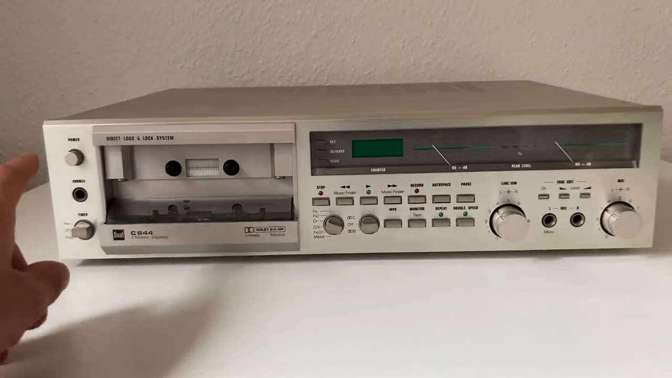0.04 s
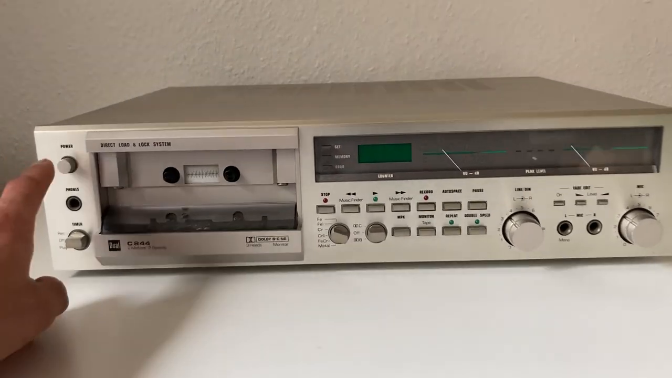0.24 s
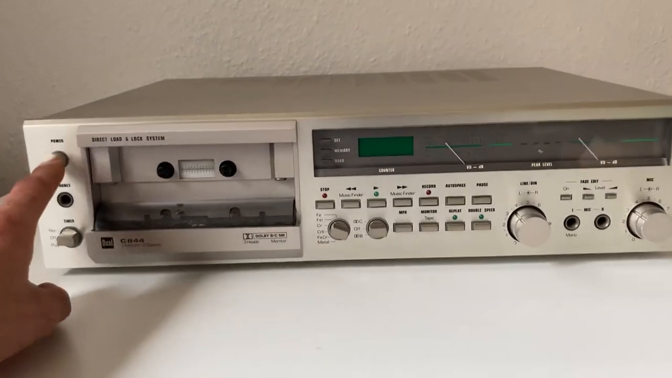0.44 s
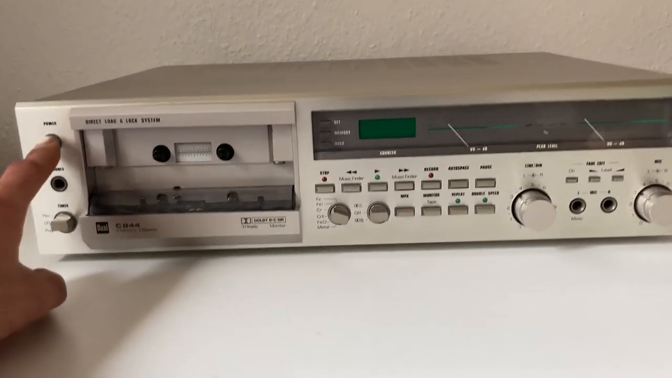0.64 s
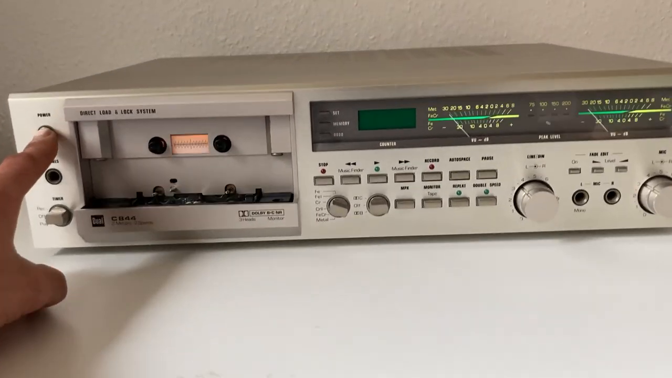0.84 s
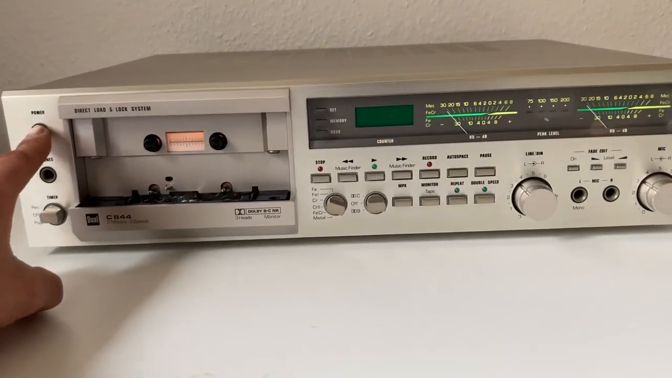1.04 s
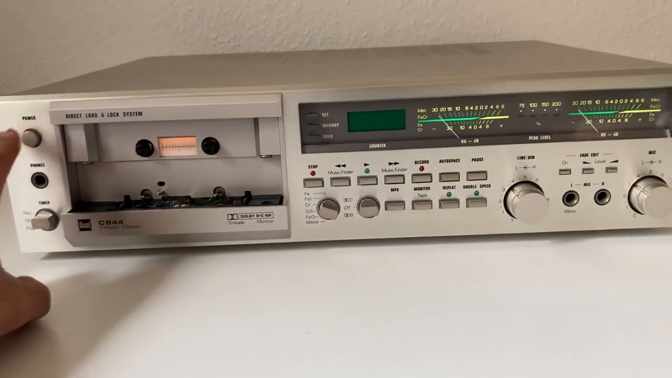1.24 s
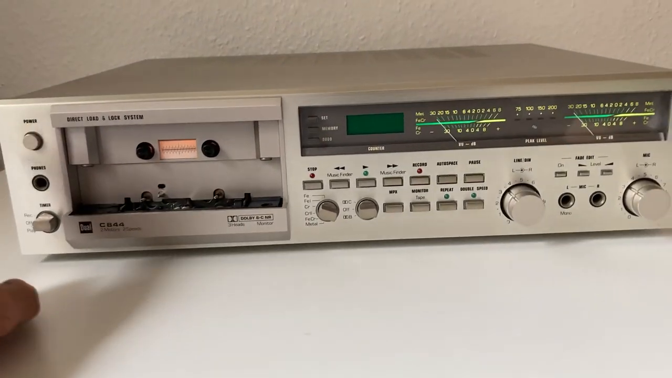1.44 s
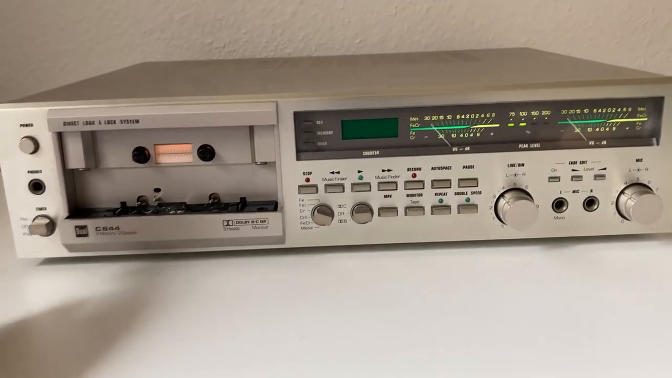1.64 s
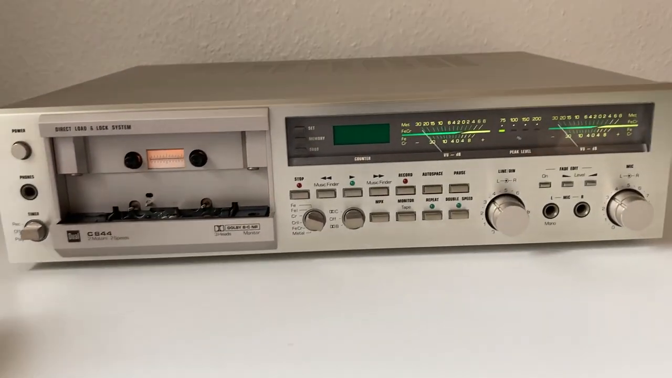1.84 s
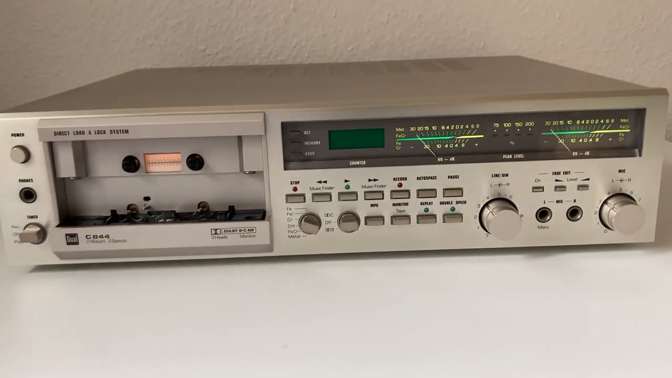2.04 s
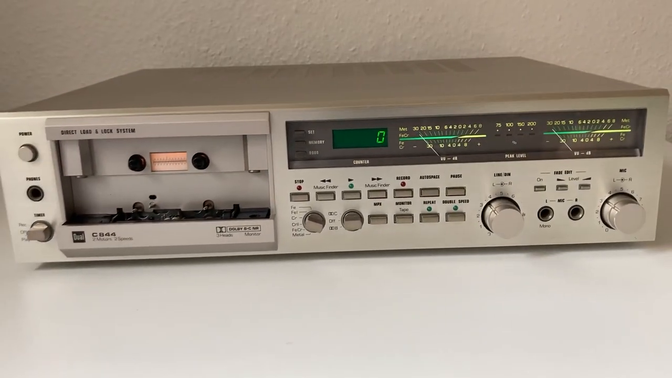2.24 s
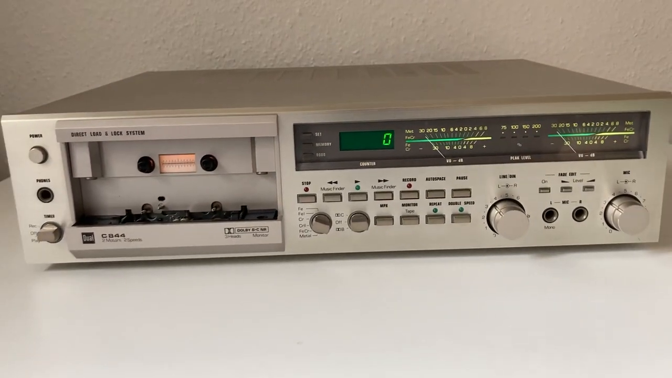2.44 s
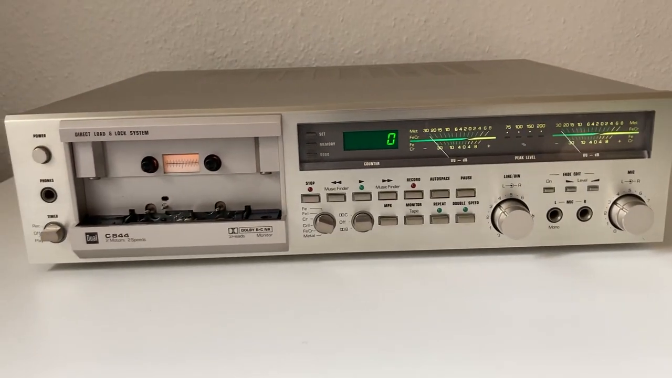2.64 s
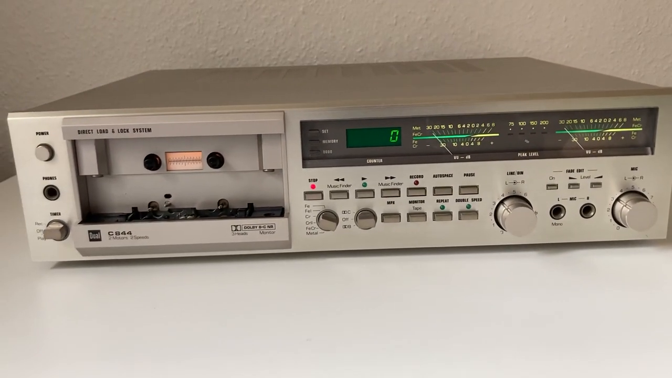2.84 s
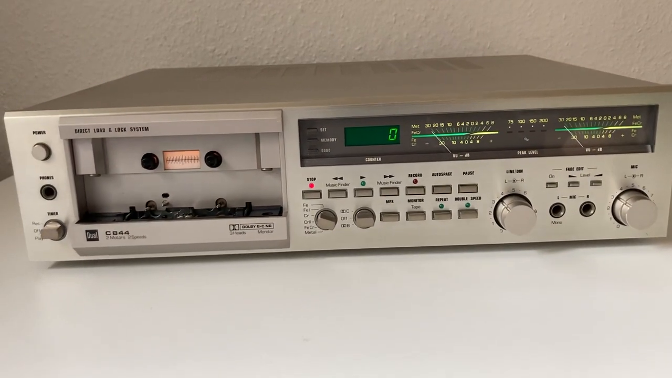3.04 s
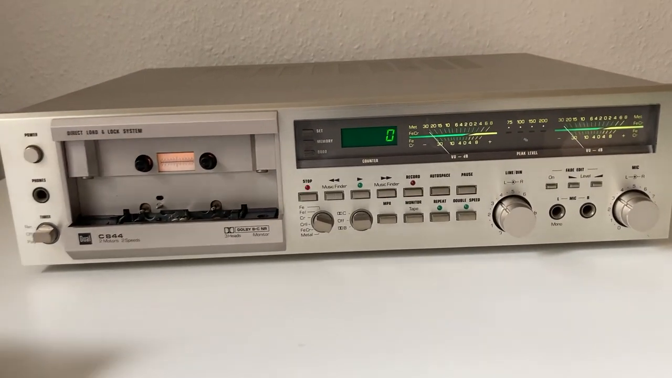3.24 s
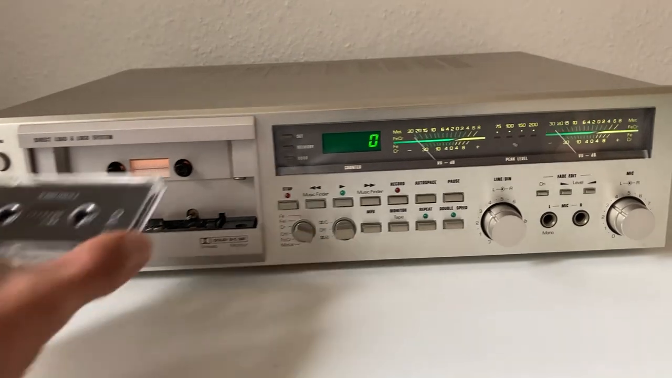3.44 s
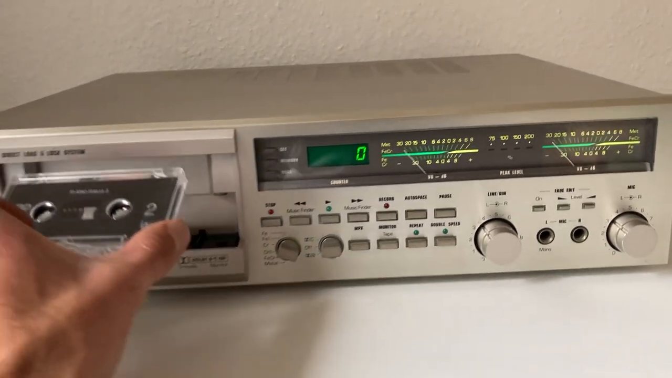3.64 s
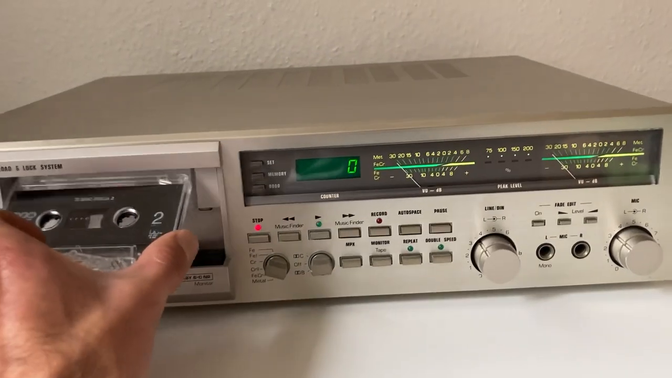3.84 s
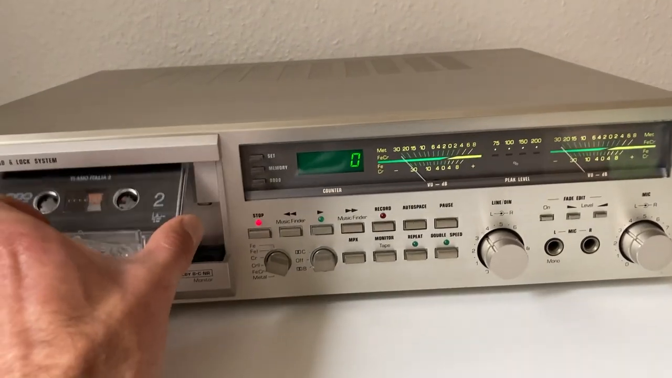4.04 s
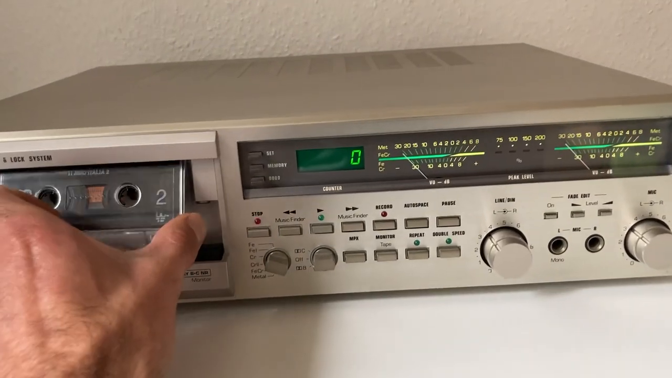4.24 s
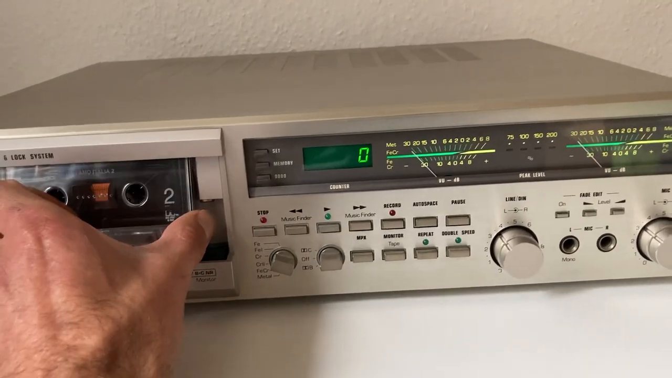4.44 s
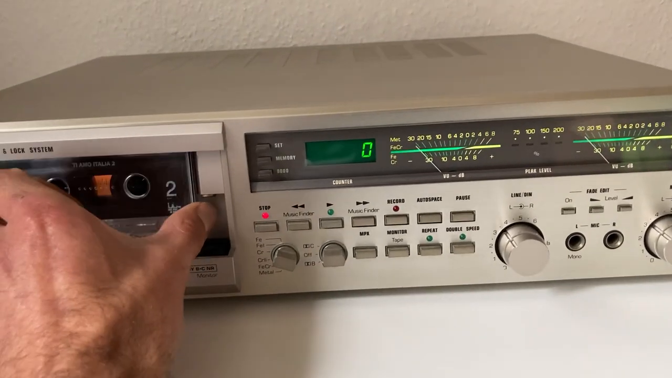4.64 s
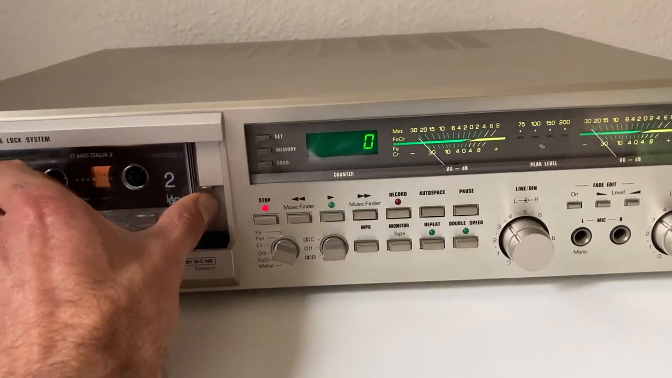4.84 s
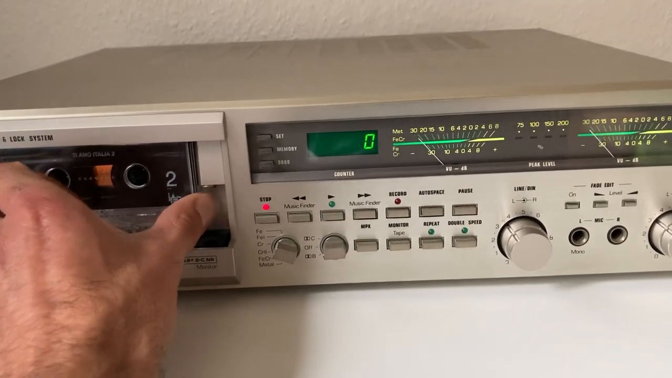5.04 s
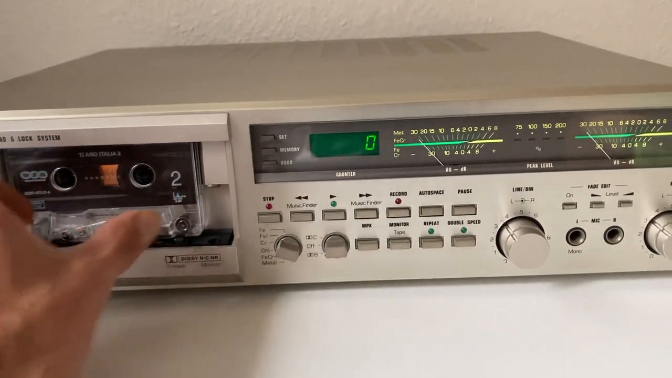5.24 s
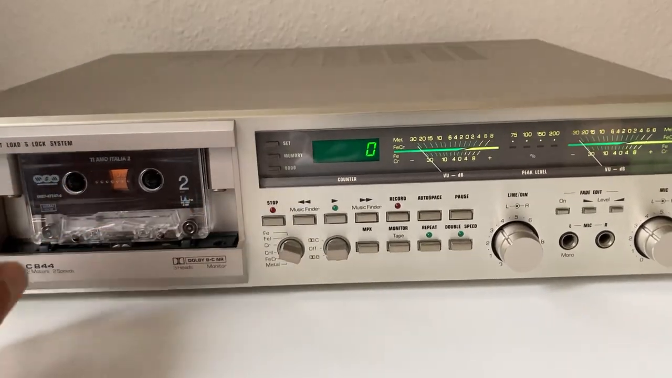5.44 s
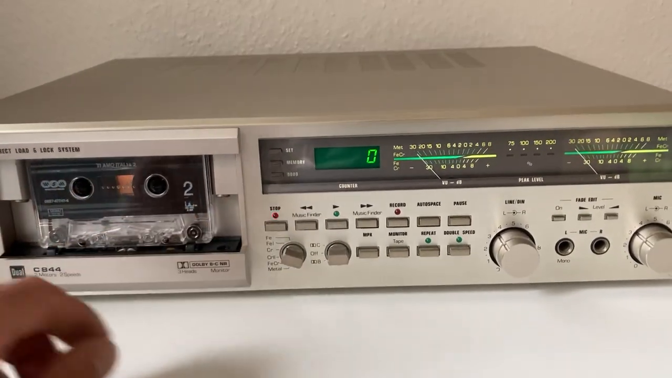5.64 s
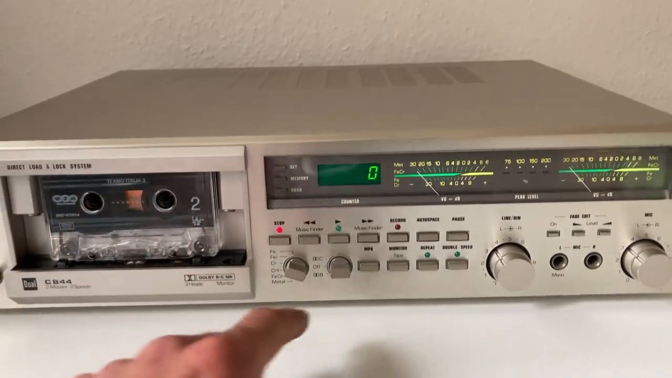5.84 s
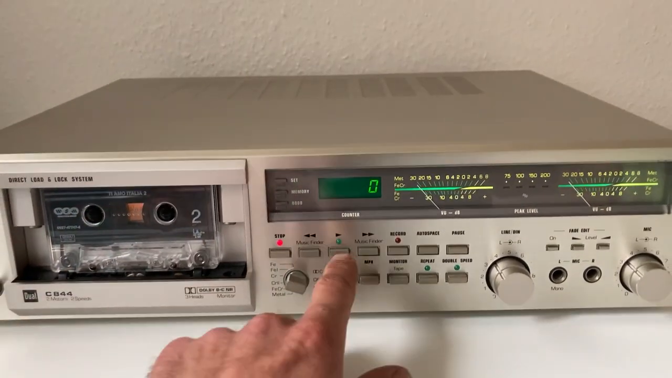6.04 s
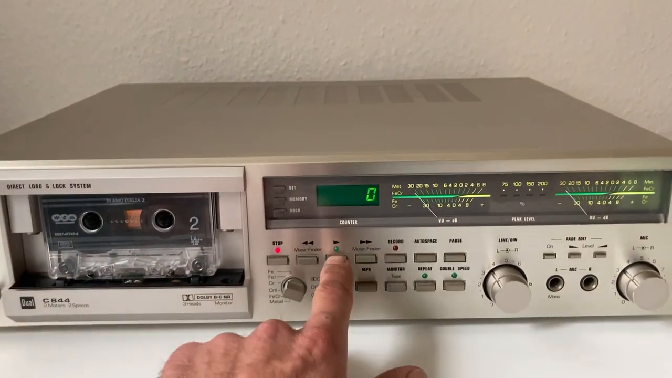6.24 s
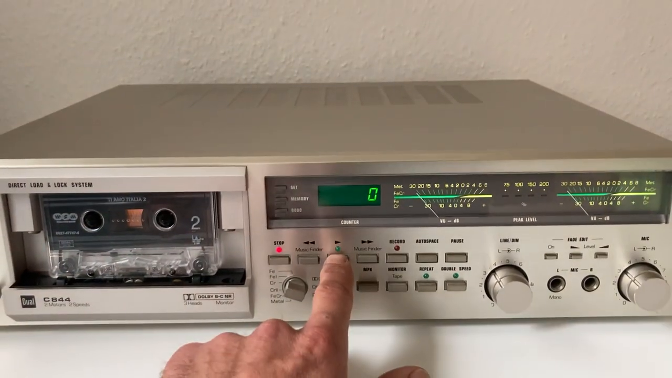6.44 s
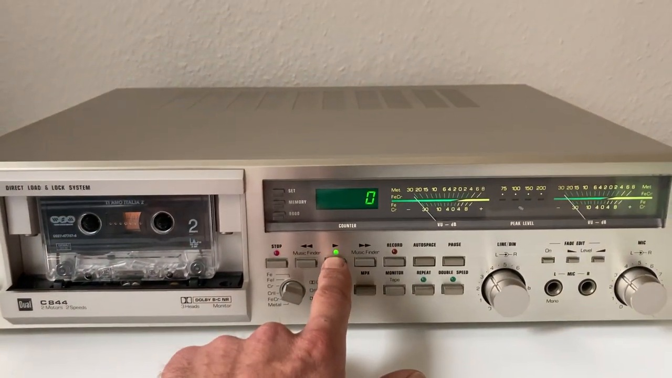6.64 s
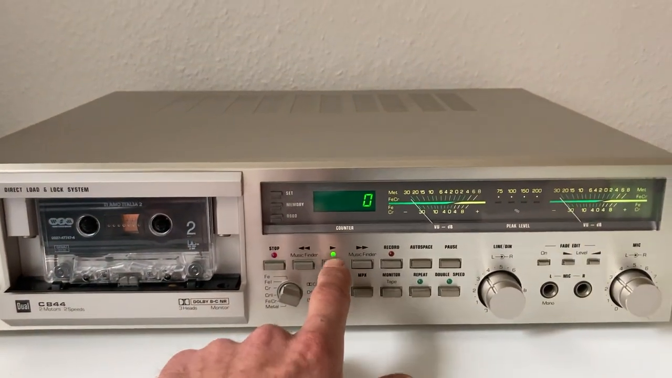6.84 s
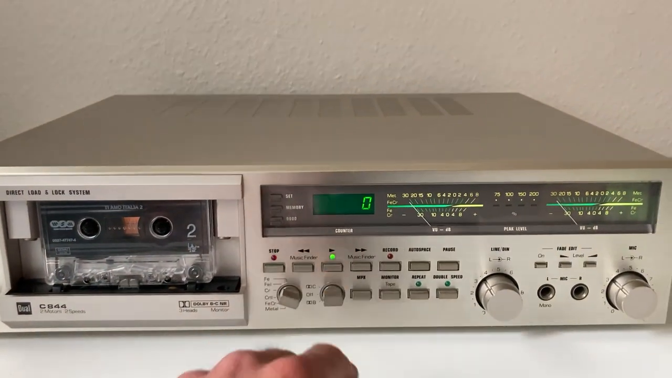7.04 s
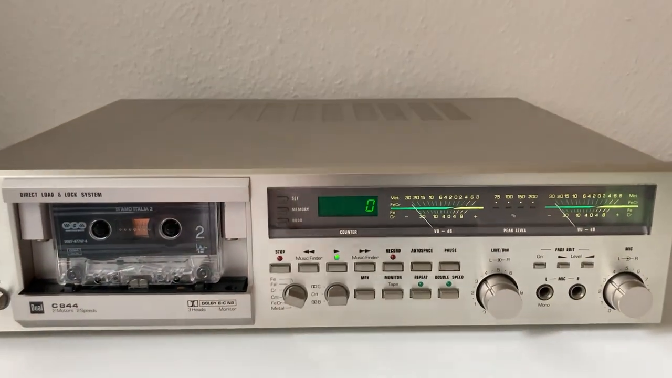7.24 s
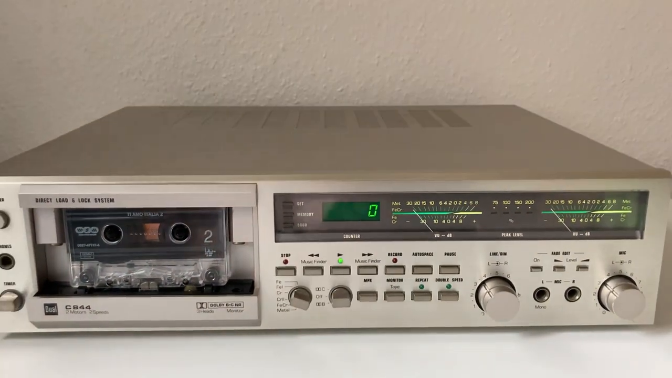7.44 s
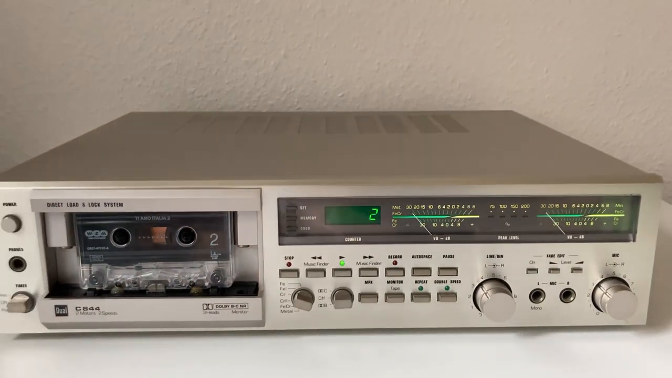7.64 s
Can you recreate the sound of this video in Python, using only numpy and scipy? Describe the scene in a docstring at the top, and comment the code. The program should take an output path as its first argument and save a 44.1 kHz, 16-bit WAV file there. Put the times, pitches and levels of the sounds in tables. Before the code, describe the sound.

Close up in a small quiet room, a finger slides onto a deck's power button, which clicks in and springs back with a faint rattle. Internal latches snap sharply. A plastic cassette knocks and scrapes into its well, juddering and ticking until it seats. A key clicks faintly, a heavy clack starts a small motor that whirrs and whines under load, and two more clacks follow close together.

```python
"""A cassette deck on a table in a small quiet room, heard from close by. Skin and plastic slide; the power switch
is pushed in, let go and rattles; the drive's latches click; a hand seats a cassette, which judders and ticks.
A play key clicks, then a motor whirrs, whines under load and winds the head carriage up in three heavy clacks.
Each blow is a short noise burst, coloured by the struck part, that excites decaying modes and the room's echo;
sliding and motor are modulated noise, the whine is a drifting tone, and still air sounds throughout."""
import sys
import numpy as np
from scipy import signal
from scipy.fft import rfft, irfft
from scipy.io import wavfile
from scipy.ndimage import uniform_filter1d

SR = 44100
rng = np.random.default_rng(int(sys.argv[2]) if len(sys.argv) > 2 else 0)


def master(y):
    """Save y as 16-bit WAV."""
    cut = np.clip(np.atleast_2d(y).T, -1, 1)
    pcm = np.round(cut * 32767)  # scale
    wavfile.write(sys.argv[1], SR, pcm.astype(np.int16))


N = 339658
TIME = np.arange(N) / SR

# Blows on each part: start_s, contact_ms, level_db, bass_shelf_db, treble_shelf_db, contact_hz
SWITCH_BLOWS = [(.7015, 1.7, -23, 1, 1, 11900), (.7295, 2.4, -8, -1, -7, 3870),
                (.7405, 4.8, -5, -19.5, -6, 3800), (.7515, 1.3, -13.5, 17.5, 4, 252),
                (.8115, 3.7, -3, -1.5, -4, 8500), (1.0508, 5.1, -10, 5.5, 4, 898)]
SPRING_CLIP_BLOWS = [(4.5379, 5, -5, -2, 2.4, 8180)]
LATCH_BLOWS = [(2.691, 4.5, 7.5, -2.5, 5, 2400), (2.702, 5.6, 2, 6.5, 8, 2760),
               (2.7758, 6.4, -6, 17, 0, 695), (2.9868, 5.8, 7.5, -13.5, 3.5, 2840),
               (3.0565, 1.9, 2, -14, -18, 2100), (3.2485, 6, -13.5, -12, -13, 2170)]
# The cassette knocks against its well; columns as above
CASSETTE_BLOWS = [(3.8992, 2.9, 6.5, 0, -3.5, 710), (3.9995, 5.3, -4.5, 8.5, -6.5, 1900),
                  (4.214, 2.2, -13.5, 3, 1.5, 1970), (4.5816, 5.2, 10, -13, -18.5, 900),
                  (4.609, 19, 1.5, -3, -8.5, 774), (4.6295, 1.3, 4, -4, -8.5, 890),
                  (4.636, 4.2, -1.5, 4.5, -3, 401), (4.7095, 4, 6.5, -8.5, 2.5, 2700)]
# Light clicks of the play key and its levers; columns as above
LEVER_BLOWS = [(6.5726, 2.8, -22, 0.5, -10.5, 2060), (7.4632, 0.7, -7.5, 11, 21.5, 14800),
               (7.468, 2.1, 5.5, -27, -18, 2710)]
# Heavy clacks of the head carriage: start_s, contact_ms, level_db, treble_shelf_db,
# pawl_lead_ms, pawl_level_db, pawl_treble_shelf_db, landing_delay_ms, case_boom_db
CARRIAGE_CLACKS = [(6.783, 5.8, 9.5, 2, 19, -14.5, -17, 10, -33), (7.4025, 5, 10.5, 0, 11, 2, 4.5, 6, -35),
                   (7.6017, 2.5, 9, 6.5, 11, -8, 5, 6, -30.5)]
# Edges of the shell tick against guides and fingernails: start_s, level_db, treble_shelf_db
EDGE_TICKS = [(4.129, -18, 2.5), (4.2053, -20.5, 5), (4.6185, -11, -1.5), (4.6861, -15.5, 5.5),
              (4.8626, -18, -7.5), (4.9497, -27, -29)]
# Spectrum of each part when struck: pitch_hz, level_db
SWITCH_COLOUR = [(130, -23), (260, -17.5), (450, -7.5), (880, -2.5), (1900, -6), (2900, -12.5),
                 (4300, -2.5), (6000, -6), (8300, -2.5), (11500, -1), (16000, -16.5)]
LATCH_COLOUR = [(300, -27.5), (700, -12), (1300, -14), (1700, -6), (2050, -9), (2450, -21.5), (2800, -11),
                (3400, -18.5), (8000, -32.5), (16000, -50.5)]
CASSETTE_COLOUR = [(130, -19.5), (270, 0.5), (480, -8.5), (850, 1.5), (1400, -8.5), (2050, -1), (3000, -10),
                   (8000, -10.5), (16000, -18)]
TRANSPORT_COLOUR = [(160, -13.5), (230, -0.5), (480, -0.5), (780, 4), (1300, -2.5), (2000, 0.5), (2900, -5),
                    (4300, 1.5), (6000, -10), (8300, -2.5), (11500, -3), (16000, -15)]
# Modes of the steel case, then of the front panel and cassette well: pitch_hz, level_db, t60_s
CASE_MODES = [(130, 0.5, 1), (226.8, 1, 0.41), (248.6, -3.5, 0.57), (296.4, -6, 0.35), (414.7, -2, 0.37),
              (703, -3, 0.18)]
PANEL_MODES = [(1142, 2, 0.13), (1268, -2.5, 0.13), (1725, -10.5, 0.11)]
# Soft thuds of fingers, cassette and case: start_s, pitch_hz, level_db, length_s
THUDS = [(0.746, 445, -54, 0.12), (0.899, 87, -50, 0.096), (3.889, 289, -34.5, 0.058),
         (4.702, 306, -34.5, 0.02), (4.818, 183.3, -47, 0.072), (7.247, 190, -39, 0.02)]
# Strokes of skin and plastic sliding: start_s, hold_s, level_db, treble_shelf_db
STROKES = [(0, 0.22, -66.5, -16), (0.625, 0.082, -61, -19), (3.857, 0.41, -65, -10.5),
           (5.091, 0.11, -64, -3), (5.656, 0.093, -60.5, -11.5)]
# Spectra of sliding, motor whirr and still air: pitch_hz, level_db
RUB_COLOUR = [(150, -7.5), (900, -7.5), (3500, -19), (11000, -13), (16000, -24)]
MOTOR_COLOUR = [(150, 0.5), (900, -6.5), (2200, -14), (16000, -30)]
AIR_COLOUR = [(26, -28.5), (45, -1), (70, -8), (130, -27), (230, -22.5), (420, -31), (2000, -43),
              (16000, -54.5)]
# Tones of the gear teeth: pitch_hz, level_db
GEAR_WHINE = [(760, -68), (1990, -76.5)]
# Echo of the room: pitch_hz, level_db, t60_s
ROOM_ECHO = [(145, 15, 0.11), (630, -5.5, 0.32), (5400, -6.5, 0.37), (16000, -14, 0.31)]

SWITCH_RELEASE_S = 1.055  # the power button springs back
LEAD_S = .004  # room for the onset ahead of each blow
SHADE_DB = 7  # left above right
SIDES = np.array([[.5], [-.5]])  # shares a level difference between left and right
JUDDER_S, JUDDER_GAP_S, JUDDER_SLOWING = 4.376, .0165, 1.115  # start, first gap, growth of each gap
STROKE_ATTACK_S, STROKE_RELEASE_DB_PER_S = 0.032, 78.5
# the motor starts, the cam takes up load, then tips over its crest and runs free after SLACK_S
MOTOR_START_S, CAM_LOAD_S, CAM_CREST_S, SLACK_S = 6.78, 7.13, 7.29, 0.045
MOTOR_DB, LOAD_DB = -64.5, 10.5  # running free; added at the crest
LOAD_SAG = 0.0288  # fraction of pitch lost at the crest
AIR_DB = -63
SHARED_HZ, PORT_LAG = 6300, 9.65  # shared treble starts here; lead in samples
TOP_HZ = 16800


def carriage(pawl_ms=5.6, pawl_bass_db=-7, strike_bass_db=-8, landing_ms=3.3, landing_db=-2.5,
             landing_bass_db=7, landing_treble_db=-4, metal_hz=7700, landing_hz=235):
    """Successive impacts: the pawl trips, the carriage strikes its stop and lands, and the chassis rattles."""
    rows = []
    for s, contact_ms, db, treble_db, lead_ms, pawl_db, pawl_treble_db, delay_ms, _ in CARRIAGE_CLACKS:
        trips = s - lead_ms / 1000
        lands = s + delay_ms / 1000
        rows += [(trips, pawl_ms, pawl_db, pawl_bass_db, pawl_treble_db, metal_hz),
                 (s, contact_ms, db, strike_bass_db, treble_db, metal_hz),
                 (lands, landing_ms, db + landing_db, landing_bass_db, landing_treble_db, landing_hz)]
        rows += rattle(lands, gap_s=.008, db=-5.5, fade_db=2.0, count=7)
    return rows


def boom():
    """Modal excitation: the carriage lands with its full weight and sets the steel case booming."""
    out, hz = np.zeros((2, N)), bins(SR)
    for s, *_, delay_ms, boom_db in CARRIAGE_CLACKS:
        tone = boom_db + on_log(hz, TRANSPORT_COLOUR)
        add(out, s + delay_ms / 1000, ringing(CASE_MODES, hz, tone, scatter_db=1, build_s=.005))
    return out * undb(SIDES * SHADE_DB / 2)


def judder(count=5, contact_ms=4.8, db=-6, bass_db=-5, treble_db=-26, bite_db=23, dull_hz=780, bright_hz=2050):
    """Stick-slip along the cassette guides: ever slower ticks, hollow at first, brightest midway."""
    gaps = JUDDER_GAP_S * JUDDER_SLOWING ** np.arange(count - 1)
    times = JUDDER_S + np.append(0, np.cumsum(gaps))
    bite = np.sin(np.pi * (times - times[0]) / (times[-1] - times[0])) ** 2
    return [(s, contact_ms, db, bass_db, treble_db + bite_db * bite[k], dull_hz if k < 2 else bright_hz)
            for k, s in enumerate(times)]


def ticks(contact_ms=3.8, bass_db=9.0, edge_hz=7500):
    """Light impact: every tick is the same brief touch of a thin plastic edge."""
    return [(s, contact_ms, db, bass_db, treble_db, edge_hz) for s, db, treble_db in EDGE_TICKS]


def rattle(s, gap_s, db, fade_db, count, contact_ms=3, bass_db=9, treble_db=-14, hollow_hz=750):
    """Repeated impact of loose parts: uneven hollow knocks, each fade_db below the last and at its own pitch."""
    chance = rng.uniform(-1, 1, (count, 2))
    return [(s + gap_s * (k + 1 + late / 2), contact_ms, db - fade_db * k, bass_db, treble_db,
             hollow_hz * 2 ** (pitch / 2))
            for k, (late, pitch) in enumerate(chance)]


def blows(rows, colour, lag_ms, left_db, contact_db, case_db, room_db, alike, panel_db=-51, size=4096):
    """Impact excitation of one part: its short clack, the room's answer, and panel and case ringing on."""
    clacks, rings, hz = np.zeros((2, N)), np.zeros((2, N)), bins(size)
    # correlation of the two channels, raised in the bass
    alike = np.clip(alike + (1 - alike) * bass(2 * hz), 0, 1)
    lag = np.exp(-2j * np.pi * hz * lag_ms / 1000)
    # the right microphone is shaded in the midrange
    sides = SIDES * left_db
    pan = undb(sides / (1 + np.log2((hz + 1) / 1000) ** 2 / 2))
    pan = pan / np.sqrt(np.mean(pan ** 2, axis=0))
    # low notes need time to build up in the case, so the first clack is thin
    thin_db = -20 * np.log10(1 + (150 / (hz + 10)) ** 2)
    fade = np.minimum(np.linspace(2, 0, size), 1) ** 2
    for s, contact_ms, db, bass_db, treble_db, contact_hz in rows:
        tone = db + on_log(hz, colour) + bass_db * bass(hz) + treble_db * treble(hz)
        peak_db = contact_db * resonance(hz, contact_hz)
        left, other = chatter(max(contact_ms, .5))
        right = (alike * left + np.sqrt(1 - alike ** 2) * other) * lag
        response = causal(tone + thin_db + peak_db + ripple(hz))
        clack = irfft(np.array([left, right]) * pan * response)
        add(clacks, s - LEAD_S, fade * clack)
        add(rings, s, undb(sides / 2) * ringing(CASE_MODES, hz, tone + case_db))
        add(rings, s, undb(sides) * ringing(PANEL_MODES, hz, tone + panel_db))
    return clacks + rings + undb(room_db) * room(clacks)


def chatter(contact_ms, size=4096, grain_db=4, settle=0.94, ring_db=-17, ring_ms=5, approach=0.54):
    """Contact noise: two unrelated noises share one envelope of soft onset, grainy contact and dying tail."""
    ms = (TIME[:size] - LEAD_S) * 1000
    onset = (ms / contact_ms - .15) / (approach * .5)
    close = 1 / (1 + np.exp(-np.clip(onset, -50, 50)))
    touch = np.exp(-np.maximum(ms / contact_ms - .7, 0) / settle)
    grain = undb(grain_db * np.repeat(rng.standard_normal(size // 16), 16))
    shape = close * (touch * grain + undb(ring_db) * np.exp(-ms / ring_ms))
    spectrum = rfft(shape * rng.standard_normal((2, size)))
    # every blow spreads its energy evenly; the part gives the colour
    return spectrum / np.sqrt(uniform_filter1d(abs(spectrum) ** 2, size=81, axis=1))


def resonance(hz, centre_hz, width=0.08):
    """Resonance curve of the point of contact, 0-1."""
    return 1 / (1 + ((hz / centre_hz - 1) / width) ** 2)


def ripple(hz, spacing_hz=130, depth_db=3.5):
    """Spectral irregularity in dB: a random ripple, fading in the treble, that sets every blow apart."""
    steps = rng.standard_normal(512)
    wave = np.interp(hz / spacing_hz, np.arange(len(steps)), steps)
    ripple_db = depth_db * (1 - treble(hz)) * wave
    # energy only moves between nearby pitches, so the blow stays about as loud
    return ripple_db - 10 * np.log10(uniform_filter1d(undb(ripple_db) ** 2, size=55))


def ringing(modes, hz, tone, scatter_db=2, build_s=0.0021):
    """Modal decay: modes as strong as the blow is at their pitch, each randomly reweighted and detuned."""
    t = TIME[:SR // 2]
    mode_hz, mode_db, t60 = np.transpose(modes)
    strength, detune = rng.standard_normal((2, len(modes)))
    gains = undb(mode_db + np.interp(mode_hz, hz, tone) + scatter_db * strength)
    waves = np.sin(2 * np.pi * np.outer(mode_hz * (1 + 0.0092 * detune), t))
    decays = np.exp(-np.log(1000) * np.outer(1 / t60, t))
    return gains @ (waves * decays) * (1 - np.exp(-t / build_s))


def shell_tick(s=5.0612, hz=4650, width_hz=480, db=-50, decay_s=0.0022, room_db=-8):
    """Resonance: a noise burst through a twofold peak filter, one thin shell tick as the thumb lets go."""
    out, t = np.zeros((2, N)), TIME[:SR // 20]
    b, a = signal.iirpeak(hz, hz / width_hz, fs=SR)
    burst = rng.standard_normal(len(t)) * np.exp(-t / decay_s)
    ring = signal.lfilter(b, a, signal.lfilter(b, a, burst))
    add(out, s, undb(db) * ring / abs(ring).max())
    return out + undb(room_db) * room(out)


def thuds():
    """Soft impact: a few swelling cycles of low vibration with a randomly wandering phase."""
    out, t = np.zeros((2, N)), TIME[:SR // 4]
    for s, hz, db, length in THUDS:
        wander = np.cumsum(rng.standard_normal(len(t))) * np.sqrt(2 * hz / SR)
        swell = np.sin(np.pi * np.minimum(t / length, 1)) ** 2
        push = np.sin(2 * np.pi * hz * t + wander) * swell
        octave = signal.butter(2, [hz / np.sqrt(2), hz * np.sqrt(2)], "band", fs=SR, output="sos")
        add(out, s, undb(db) * signal.sosfilt(octave, push))
    return out


def motor(hum_hz=65, hum_db=-60, spin_up_s=0.041):
    """Modulated gear noise and hum; load makes the whirr louder and brings in a whine that sags in pitch."""
    load = ramp(CAM_LOAD_S, CAM_CREST_S - CAM_LOAD_S) - ramp(CAM_CREST_S, SLACK_S)
    hum = undb(hum_db) * np.sin(2 * np.pi * hum_hz * TIME)
    waver = flicker(10, depth_db=2.5)
    whirr = undb(MOTOR_DB) * noise(MOTOR_COLOUR) * flicker(120, depth_db=3)
    teeth = sum(undb(db) * whine(hz * (1 - LOAD_SAG * load)) for hz, db in GEAR_WHINE)
    gears = whirr + np.sqrt(np.maximum(load, 0)) * teeth * waver
    return ramp(MOTOR_START_S, spin_up_s) * (undb(LOAD_DB * load) * gears + hum * waver)


def whine(hz, width_hz=70):
    """Narrow-band noise: slow random drift carried along a pitch curve, rms 1."""
    lowpass = signal.butter(2, width_hz / 2, fs=SR, output="sos")
    drift = signal.sosfilt(lowpass, rng.standard_normal((2, N)))
    turn = 2 * np.pi * np.cumsum(hz) / SR
    tone = drift[0] * np.cos(turn) + drift[1] * np.sin(turn)
    return tone / tone.std()


def rubbing():
    """Friction noise of fingers and shell: a flickering rustle below, a steadier fine hiss above."""
    spectrum, hz = rfft(noise(RUB_COLOUR)), bins(N)
    hiss = irfft(spectrum * treble(hz), N)
    low = irfft(spectrum * bass(hz), N)
    middle = irfft(spectrum * (1 - bass(hz) - treble(hz)), N)
    rustle = low * flicker(60, depth_db=4.5) + middle * flicker(90, depth_db=5.5)
    rustle = rustle * flicker(700, depth_db=3)
    out = 0
    for s, hold_s, db, treble_db in STROKES:
        release_db = STROKE_RELEASE_DB_PER_S * np.maximum(TIME - s - STROKE_ATTACK_S - hold_s, 0)
        envelope = ramp(s, STROKE_ATTACK_S) * undb(db - release_db)
        out = out + envelope * (rustle + undb(treble_db) * hiss)
    return out


def room(x, build_s=0.0035, size=32768):
    """Reverberation of table and walls: the left channel feeds a diffuse tail, each band with its own decay."""
    t, hz, field = TIME[:size], bins(size), diffuse(size)
    centres = np.geomspace(100, 16000, 12)
    build = 1 - np.exp(-(t / build_s) ** 2)
    echo = 0
    for centre, weights in zip(centres, np.eye(len(centres))):
        band = irfft(field * np.interp(np.log(hz + 1), np.log(centres), weights))
        decay = np.exp(-np.log(1000) * t / on_log(centre, ROOM_ECHO, column=2))
        echo = echo + band * decay * build
    spectrum = rfft(echo)
    # even out neighbouring pitches before colouring
    uneven_db = 10 * np.log10(uniform_filter1d(np.mean(abs(spectrum) ** 2, axis=0), size=45))
    response = irfft(spectrum * causal(on_log(hz, ROOM_ECHO) - uneven_db))
    return signal.fftconvolve(x[:1], response, axes=1)[:, :N]


def air():
    """Background noise: the still room as steady coloured noise."""
    return undb(AIR_DB) * noise(AIR_COLOUR)


def noise(colour):
    """Spectral shaping: coloured stereo noise, rms 1."""
    x = irfft(diffuse(N) * undb(on_log(bins(N), colour)), N)
    return x / x.std()


def diffuse(size, apart_hz=600):
    """Diffuse-field coherence: spectrum of stereo noise alike in the bass and unrelated higher up."""
    mid, side = rfft(rng.standard_normal((2, size)))
    alike = .93 / (1 + (bins(size) / apart_hz) ** 3)
    return mid * np.sqrt((1 + alike) / 2) + np.array([[1], [-1]]) * side * np.sqrt((1 - alike) / 2)


def flicker(rate, depth_db):
    """Amplitude modulation: a randomly wavering gain, rate steps a second, rms 1."""
    steps = rng.standard_normal(N // 20)
    gain = undb(depth_db * np.interp(TIME * rate, np.arange(len(steps)), steps))
    return gain / np.sqrt(np.mean(gain ** 2))


def ramp(start_s, length_s):
    """Linear envelope: a straight rise from 0 to 1."""
    return np.clip((TIME - start_s) / max(length_s, 1 / SR), 0, 1)


def causal(db):
    """Minimum-phase response of a dB spectrum: it rings after the blow, never before."""
    cepstrum = irfft(np.log(undb(db)))
    half = len(cepstrum) // 2
    cepstrum[1:half] *= 2
    cepstrum[half + 1:] = 0
    return np.exp(rfft(cepstrum))


def bass(hz):
    """Shape of the bass shelf, 0-1."""
    return 1 / (1 + (hz / 800) ** 2)


def treble(hz):
    """Shape of the treble shelf, 0-1."""
    return hz ** 4 / (hz ** 4 + 5000. ** 4)


def undb(db):
    """Decibels to amplitude gain."""
    return 10 ** (np.asarray(db) / 20)


def on_log(hz, points, column=1):
    """Interpolation of a table along a log-frequency axis."""
    points = np.array(points, float)
    return np.interp(np.log(hz + 1), np.log(points[:, 0]), points[:, column])


def bins(size):
    """Frequencies of a spectrum of this many samples."""
    return np.fft.rfftfreq(size, 1 / SR)


def add(out, s, sound):
    """Superposition: mix a sound in at a time in seconds."""
    start = int(s * SR)
    out[..., start:start + sound.shape[-1]] += sound[..., :N - start]


def scene():
    """Superposition of the deck's parts, the hand and the room."""
    release = rattle(SWITCH_RELEASE_S, gap_s=0.012, db=-21.0, fade_db=-0.26, count=8)  # grows slightly
    transport = blows(LEVER_BLOWS + carriage(), TRANSPORT_COLOUR, lag_ms=0.18, left_db=SHADE_DB,
                      contact_db=3.5, case_db=-62, room_db=-4.0, alike=0.69)
    cassette = blows(CASSETTE_BLOWS + ticks() + judder(), CASSETTE_COLOUR, lag_ms=0.23, left_db=SHADE_DB,
                     contact_db=8, case_db=-52, room_db=-5.0, alike=0.76)
    switch = blows(SWITCH_BLOWS + SPRING_CLIP_BLOWS + release, SWITCH_COLOUR, lag_ms=0.433, left_db=SHADE_DB,
                   contact_db=11.0, case_db=-47.5, room_db=-0.5, alike=0.13)
    latch = blows(LATCH_BLOWS, LATCH_COLOUR, lag_ms=0.443, left_db=1.5,
                  contact_db=7.5, case_db=-60, room_db=-3, alike=0.91, panel_db=-58)
    impacts = transport + boom() + cassette + switch + latch + shell_tick() + thuds()
    return impacts + motor() + rubbing() + air()


def record(dry):
    """Shared-treble pickup: high up, the right is the left inverted and slightly early; the top is cut."""
    hz = bins(N)
    left, right = rfft(dry)
    shared = np.clip((hz - SHARED_HZ) / 600 + .5, 0, 1)
    early = left * np.exp(2j * np.pi * hz * PORT_LAG / SR)
    right = np.sqrt(1 - shared) * right - np.sqrt(shared) * early
    lowpass = signal.ellip(8, .2, 70, TOP_HZ, fs=SR, output="sos")
    return signal.sosfilt(lowpass, irfft(np.array([left, right]), N))


dry = scene()
out = record(dry)
master(out)
```